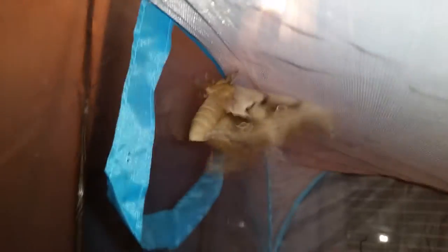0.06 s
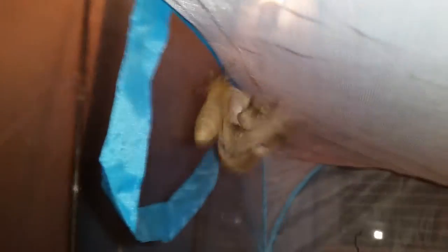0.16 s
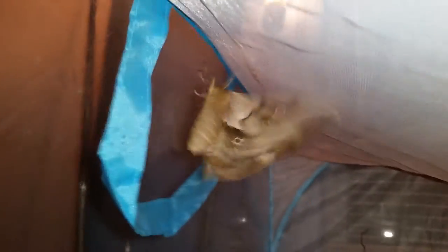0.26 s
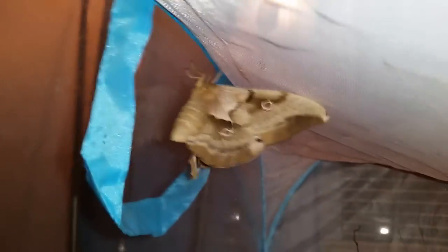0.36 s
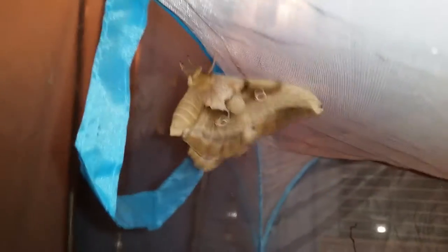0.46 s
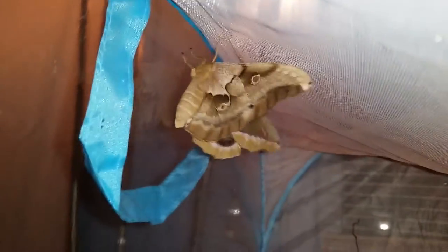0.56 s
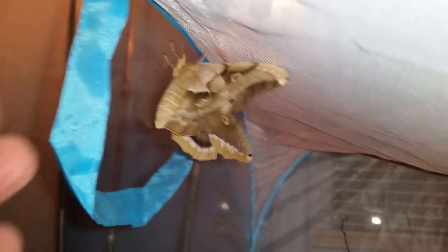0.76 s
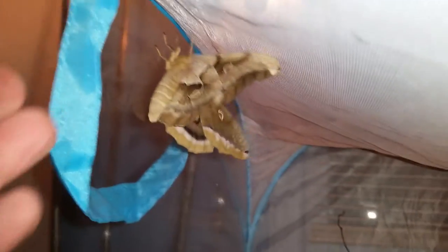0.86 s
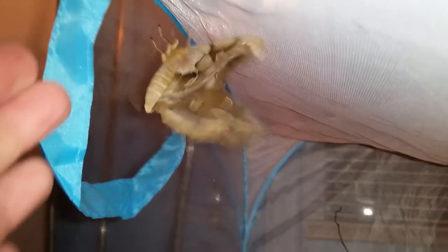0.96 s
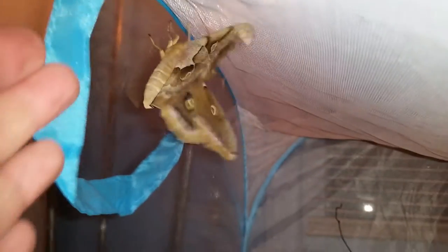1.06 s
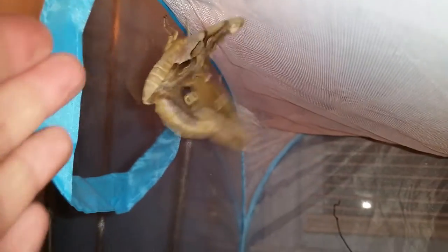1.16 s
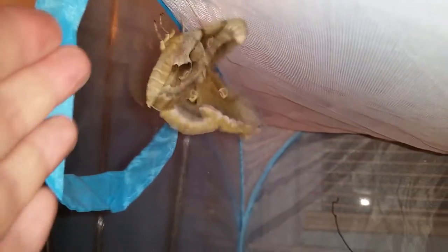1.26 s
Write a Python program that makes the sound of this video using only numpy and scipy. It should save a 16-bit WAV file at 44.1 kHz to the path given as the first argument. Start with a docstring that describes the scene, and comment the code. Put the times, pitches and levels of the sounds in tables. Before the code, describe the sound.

A large moth flutters on a mesh cage right by the microphone, its wings puffing air for the first 0.4 seconds. Around 0.2 seconds the cage scrapes and knocks in a tight cluster on the left, leaving a low ring in the quiet room. Soft bumps follow at 0.3 and 0.65 seconds. Fabric slides with a thin hiss and dull rumble near 0.85, then faint ticks until 1.3.

```python
"""A large moth flaps on a pop-up mesh cage, right by the microphone, in a quiet room.
Its wings push air at the two ports and threads of the mesh tick. Close to the left port the cage
scrapes and knocks three times; its frame rings on at one low note and the room answers.
Two soft bumps follow, then fabric slides with a thin hiss as a hand shifts the cage."""
import sys
import numpy as np
from scipy import signal
from scipy.fft import rfft, irfft, next_fast_len
from scipy.io import wavfile
from scipy.ndimage import uniform_filter1d

SR = 44100
rng = np.random.default_rng(int(sys.argv[2]) if len(sys.argv) > 2 else 0)


def generate_wav(signal):
    """Clip the signal to [-1, 1] and save it as 16-bit WAV at the path in sys.argv[1]."""
    frames = np.transpose(np.atleast_2d(signal))
    scaled = np.clip(frames, -1, 1) * 32767
    pcm = np.round(scaled).astype(np.int16)
    wavfile.write(sys.argv[1], SR, pcm)


N = 57330

# spectrum of the wings at close range: f/Hz, left/dB, right/dB
WING_COLOUR = [(25, -57.5, -40), (65, -32.5, -28.5), (200, -39.5, -36.5), (370, -48, -46),
               (800, -56.5, -55.5), (1480, -62.5, -63.5), (3000, -75.5, -78.5), (7560, -80.5, -99),
               (10000, -80, -78), (11500, -68.5, -60), (15500, -75, -75.5)]
# puffs of air on the ports: t/s, left/dB, right/dB
AIR_PUFFS = [(0.117, -51, -37.5), (0.1311, -57, -36), (0.204, -57, -60), (0.279, -56, -48),
             (0.2869, -61, -26.5), (0.2997, -35.5, -29), (0.313, -60, -38), (0.3306, -41, -32.5)]
# spectrum of the quiet room: f/Hz, left/dB, right/dB
ROOM_TONE_COLOUR = [(20, -45, -47.5), (51, -38, -33.5), (90, -46.5, -45.5), (176, -44.5, -46.5),
                    (412, -57.5, -57.5), (780, -71, -73), (1530, -74.5, -77), (3500, -77.5, -83),
                    (7700, -78.5, -89), (8900, -95, -95), (11200, -80.5, -76), (15500, -82, -81.5)]
# snaps of the mesh: t/s, level/dB, decay/ms, tilt/(dB per octave)
MESH_TICKS = [(.019, -21, 1.6, -5.5), (0.1064, -12, 0.87, 0), (.138, -18, 1.7, -4.5),
              (.174, -20.5, 0.8, 4.5), (0.1944, -10, 0.45, 5), (0.2048, -7, 1.7, -1), (0.217, 6, 0.55, 0),
              (0.2214, 14, 0.67, 1.5), (0.2277, 6.5, 0.51, -7.5), (0.2451, 14.5, 0.56, 2.5),
              (0.2632, -3.5, 1.9, -3), (0.2873, -6.5, 1.5, 0.5), (0.293, -8.5, .6, 4.5),
              (0.324, 8.5, 0.44, -2), (0.3261, -6, 7, 3), (0.4163, -19, 2, -4), (.684, -23, 0.7, 1.5),
              (1.091, -22.5, 0.74, 2.5), (1.12, -22.5, 0.83, 4.5), (1.1383, -21, 0.59, .5),
              (1.211, -22, 0.65, 2.5), (1.2221, -21.5, 1.7, -1), (1.2264, -19, 0.64, 0),
              (1.268, -17.5, 0.9, 1.5)]
# spectrum shared by all snaps: f/Hz, left/dB, right/dB
TICK_COLOUR = [(100, -45, -31.5), (393, -24, -32.5), (820, -25.5, -33.5), (1700, -34.5, -34),
               (3000, -38.5, -49.5), (4620, -34.5, -66), (8000, -42, -59), (9300, -51, -57),
               (11950, -54, -42.5), (15500, -48.5, -51.5)]
# pressure of the scrape: t/s, level/dB
SCRAPE_PRESSURE = [(0.167, -34.5), (0.197, -29.5), (0.206, -10), (.213, -17), (.218, -5.5), (0.224, -12.5),
                   (0.23, -2), (0.239, -0.5), (0.251, -2.5), (0.257, -20.5), (.275, -58.5)]
# spectrum of the scrape: f/Hz, left/dB, right/dB
SCRAPE_COLOUR = [(50, -13, -15), (200, -26, -19), (470, -13, -32.5), (900, -28.5, -60.5), (1900, -32, -64),
                 (3017, -36, -63.5), (5260, -35, -71), (7830, -36.5, -69), (9200, -51.5, -68.5),
                 (11900, -45.5, -44.5), (15500, -76.5, -53)]
# contacts, bunched into three knocks: t/s, level/dB, contact time/ms, gain (+ push, - pull)
KNOCK_CONTACTS = [(0.2218, -4.5, 0.52, 0.89), (0.2278, -7.5, 0.29, -0.68), (0.2284, -16.5, 0.31, 0.46),
                  (0.2457, -15, 0.32, -1.08), (0.2472, -15.5, 0.27, 0.76)]
# modes of the cage: f/Hz, t60/s, left/dB, right/dB
CAGE_MODES = [(70.6, 0.082, -24, -39.5), (112, .1, -21, -33.5), (234.34, 0.78, -24.5, -55.5),
              (300, .06, -31.5, -51.5), (412.7, 0.053, -7.5, -27), (444.7, 0.069, -15.5, -25),
              (770, 0.013, -3, -41), (1137, 0.017, -5.5, -21.5), (2036, .1, -8, -32.5)]
# spectrum of the room's tail: f/Hz, left/dB, right/dB
TAIL_COLOUR = [(103, -39.5, -30.5), (400, -29.5, -39), (800, -44, -42.5), (1560, -45.5, -46.5),
               (2840, -50, -54), (4900, -52, -65), (7700, -49, -61.5), (9300, -60, -60.5),
               (12000, -54, -51), (15500, -53.5, -54.5)]
# padded bumps on the cage: t/s, level/dB, right port against left/dB
PADDED_BUMPS = [(0.324, -5, -11), (0.6559, -1.5, -14)]
# hollow spectrum of a bump: f/Hz, level/dB
BUMP_COLOUR = [(60, -26), (150, -11.5), (280, -0.5), (460, -1.5), (680, -25), (1300, -29.5), (2200, -52),
               (6000, -70)]
# bands of fabric hiss: peak t/s, rise/s, fall/s, centre f/Hz, width/Hz, left/dB, right/dB
FABRIC_BANDS = [(0.794, 0.077, 0.11, 15200, 2200, -55, -57.5), (0.85, 0.14, .13, 13000, 2260, -63, -61),
                (0.9, 0.088, 0.22, 7110, 1240, -62.5, -81), (0.9, 0.18, 0.18, 5130, 2540, -70, -90),
                (0.775, 0.13, 0.25, 1300, 2860, -73, -74.5)]
# low rumble of the hand moving the cage: f/Hz, left/dB, right/dB
HANDLING_COLOUR = [(19.9, -52.5, -50), (54.5, -34, -32.5), (95.4, -57.5, -52), (163, -48, -43.5),
                   (391, -56.5, -56.5), (868, -74.5, -71), (3930, -100, -100)]


def amp(db):
    """Decibels to gain."""
    return 10 ** (np.asarray(db, float) / 20)


def clock():
    """Time of each sample in seconds."""
    return np.arange(N) / SR


def bin_hz(size=N):
    """Frequency of each bin of a real FFT."""
    return np.arange(size // 2 + 1) * SR / size


def ports(left_db, right_db):
    """Gains at the two microphone ports, as a column."""
    return amp([[left_db], [right_db]])


def noise():
    """Unrelated white noise for each port."""
    return rng.standard_normal((2, N))


def drift(rate_hz):
    """Smooth random drift with a spread near 1."""
    hold = max(int(SR / rate_hz), 2)
    steps = np.repeat(rng.standard_normal(N // hold + 1), hold)
    return 1.2 * uniform_filter1d(steps, hold)[:N]


def decay(age, t60):
    """Envelope that falls 60 dB in t60 seconds."""
    return np.exp(-np.log(1000) * age / t60)


def highpass(x, hz, order=1):
    """Bass cut."""
    return signal.sosfilt(signal.butter(order, hz, "high", fs=SR, output="sos"), x)


def colour(x, table):
    """Minimum-phase filter through points of f/Hz, left/dB, right/dB."""
    size = next_fast_len(2 * N)
    size += size % 2
    hz, *sides = np.array(table, float).T
    log_f = np.log(np.maximum(bin_hz(size), 1))
    gain = amp([np.interp(log_f, np.log(hz), side) for side in sides])
    cepstrum = irfft(np.log(gain))
    cepstrum[:, 1:size // 2] *= 2  # folded forward, so nothing sounds ahead of its cause
    cepstrum[:, size // 2 + 1:] = 0
    return irfft(rfft(x, size) * np.exp(rfft(cepstrum, size)))[:, :N]


def diffuse(shared_below_hz=125):
    """Noise from all around: alike at the two ports in the bass, unrelated in the treble."""
    alike = 1 / (1 + (bin_hz() / shared_below_hz) ** 2)
    mid, side = rfft(noise()) * np.sqrt([(1 + alike) / 2, (1 - alike) / 2])
    return irfft(np.array([mid + side, mid - side]), N)


def wings(stop_s=0.32, fade_s=0.12, depth_db=2.5, puff_s=0.0015):
    """Wings right by the microphone: a steady rustle, an uneven low flutter, puffs on the ports."""
    t = clock()
    effort = np.exp(-np.maximum(t - stop_s, 0) / fade_s)
    air = noise()
    rustle = highpass(air, hz=500)
    flutter = (air - rustle) * amp(depth_db * drift(rate_hz=160))
    puffs = sum(ports(left, right) * np.exp(-((t - at) / puff_s) ** 2) for at, left, right in AIR_PUFFS)
    return colour(effort * (rustle + flutter), WING_COLOUR) - highpass(puffs, hz=55)


def room_tone(start_db=1.5, fall_db_per_s=3):
    """Low rumble and faint hiss of the quiet room all around, slowly settling."""
    return colour(diffuse(), ROOM_TONE_COLOUR) * amp(start_db - fall_db_per_s * clock())


def mesh_ticks(size=1024, pivot_hz=2980, flat_below_hz=700):
    """Single threads snap free: a sharp click and a brief crackle, some dull and some bright."""
    out, lead = np.zeros((2, N + size)), size // 4
    age_ms = (np.arange(size) - lead) * 1000 / SR
    octaves = np.log2(np.maximum(bin_hz(size), flat_below_hz) / pivot_hz)
    click = 2.41 * (age_ms == 0)
    for at, db, decay_ms, tilt in MESH_TICKS:
        crackle = 0.65 * rng.standard_normal((2, size)) * (age_ms > 0) * np.exp(-abs(age_ms) / decay_ms)
        start = max(int(at * SR) - lead, 0)
        out[:, start:start + size] += irfft(rfft(click + crackle) * amp(db + tilt * octaves))
    return colour(out[:, :N], TICK_COLOUR)


def mesh_scrape(grains_per_s=3400, spread_db=4):
    """By the left port, threads catch and slip in dense grains as the pressure builds."""
    caught = rng.random(N) < grains_per_s / SR
    grains = caught * amp(spread_db * rng.standard_normal(N)) * np.sign(noise())
    at, db = np.array(SCRAPE_PRESSURE).T
    pressure = amp(np.interp(clock(), at, db, left=-np.inf, right=-np.inf))
    return colour(grains / grains.std() * pressure, SCRAPE_COLOUR)


def cage_knocks():
    """Short contacts close to the left port thud and set the cage's modes ringing."""
    t, ms_per_sample = clock(), 1000 / SR
    force = sum(push * amp(db) * np.exp(-abs(t - at) * 1000 / contact_ms)
                for at, db, contact_ms, push in KNOCK_CONTACTS)
    ring = sum(ports(left, right) * np.cos(2 * np.pi * hz * t) * decay(t, t60)
               for hz, t60, left, right in CAGE_MODES)
    thud = ports(left_db=-3, right_db=-50) * highpass(force, hz=170)
    return thud + ms_per_sample * signal.fftconvolve(force[None], ring, axes=1)[:, :N]


def room_tail(start_s=0.23, build_s=0.081, t60=0.78):
    """The room's diffuse tail builds and dies away after the knocks."""
    age = np.maximum(clock() - start_s, 0)
    build = 1 - np.exp(-age / build_s)
    return colour(noise() * build * decay(age, t60), TAIL_COLOUR)


def cage_bumps(ring_db=-55.5):
    """Padded contacts on the left: a hollow thud, and the frame's longest mode rings again faintly."""
    t = clock()
    hz, t60 = max(CAGE_MODES, key=lambda mode: mode[1])[:2]
    ring = amp(ring_db) * np.sin(2 * np.pi * hz * t) * decay(t, t60)
    force = sum(ports(0, right) * amp(db) * (np.arange(N) == int(at * SR))
                for at, db, right in PADDED_BUMPS)
    thud = colour(force, [(f, db, db) for f, db in BUMP_COLOUR])
    return thud + signal.fftconvolve(force, ring[None], axes=1)[:, :N]


def fabric_slide(roundness=1.5, skirt_order=2.1, flicker_db=0.85):
    """Fine weave slides: bands of hiss swell and fade."""
    t, out = clock(), 0
    for at, rise, fall, hz, width, left, right in FABRIC_BANDS:
        from_peak = abs(t - at) / np.where(t < at, rise, fall)
        onset = np.clip((t - at) / rise + 2, 0, 1)
        swell = onset * np.exp(-0.7 * from_peak ** roundness)
        off_centre = abs(2 * (bin_hz() - hz) / width)
        hiss = irfft(rfft(noise()) / np.sqrt(1 + off_centre ** (2 * skirt_order)), N)
        out = out + ports(left, right) * swell * hiss
    return out * amp(flicker_db * drift(rate_hz=54))


def handling(peak_s=0.875, width_s=0.12):
    """The cage shifts under the hand with a dull swell."""
    return colour(diffuse(), HANDLING_COLOUR) / np.cosh((clock() - peak_s) / width_s)


def scene():
    """Moth, cage and room as they reach the two ports."""
    return (wings() + room_tone() + mesh_ticks() + mesh_scrape() + cage_knocks()
            + room_tail() + cage_bumps() + fabric_slide() + handling())


def record(dry, low_cut_hz=42, top_hz=15900):
    """The recorder rolls off the deep bass and cuts the top steeply."""
    top_cut = signal.ellip(10, 0.2, 70, top_hz, fs=SR, output="sos")
    return signal.sosfilt(top_cut, highpass(dry, low_cut_hz, order=2))


dry = scene()
out = record(dry)
generate_wav(out)
```